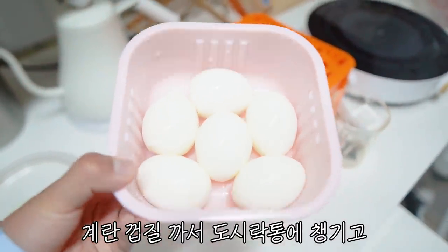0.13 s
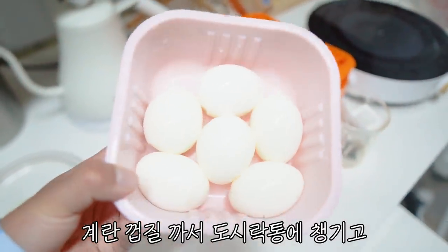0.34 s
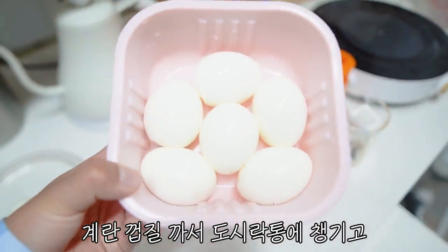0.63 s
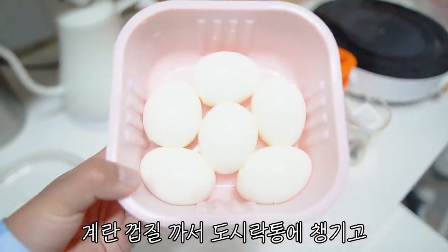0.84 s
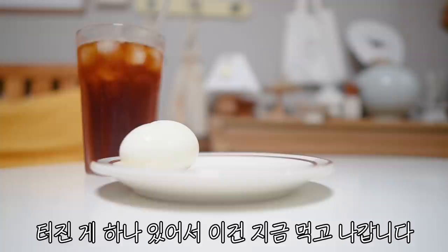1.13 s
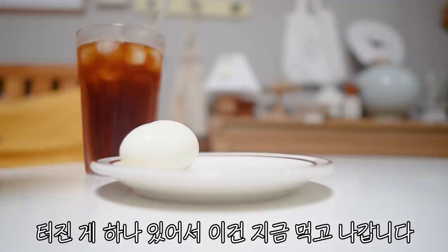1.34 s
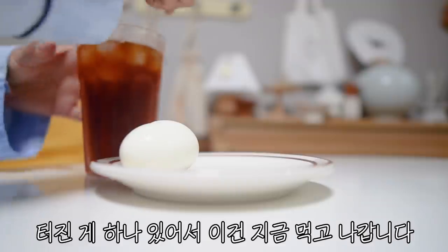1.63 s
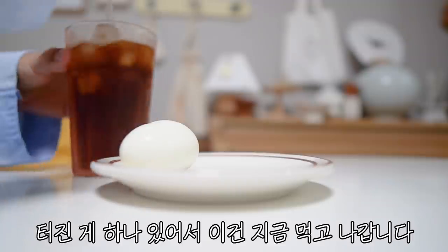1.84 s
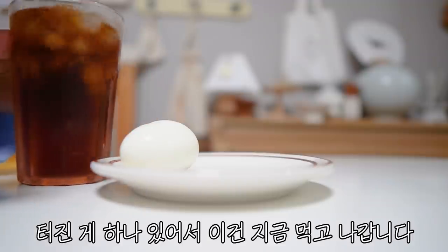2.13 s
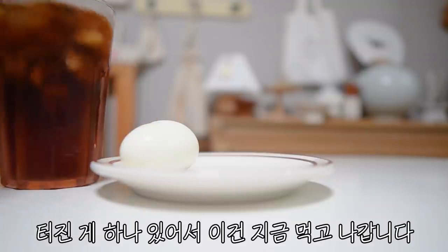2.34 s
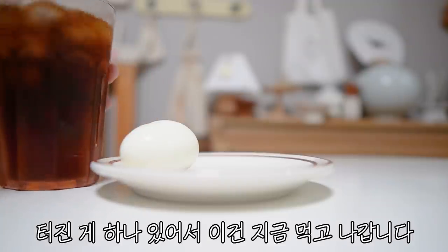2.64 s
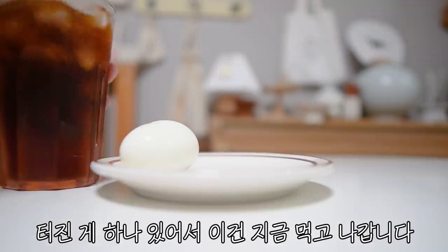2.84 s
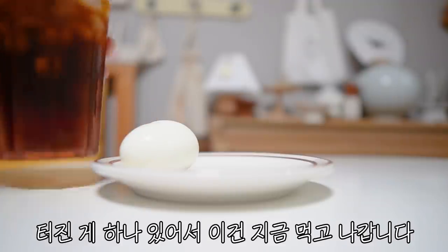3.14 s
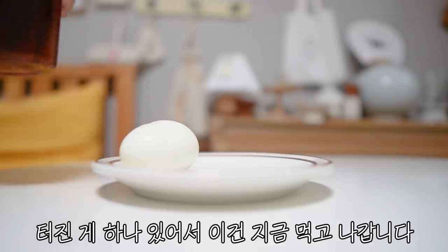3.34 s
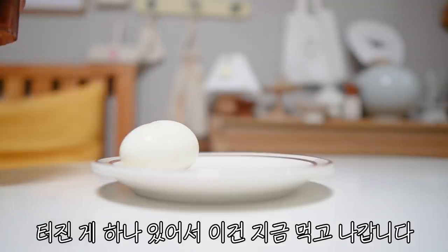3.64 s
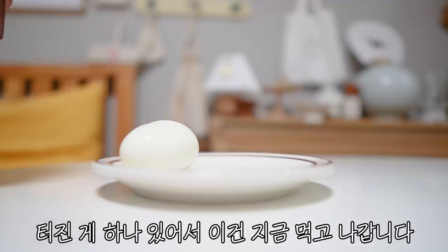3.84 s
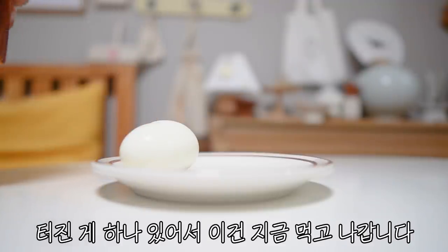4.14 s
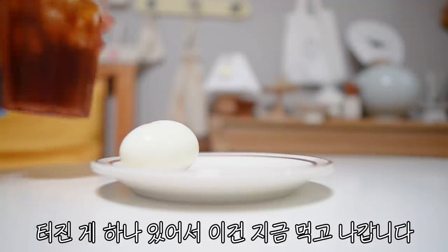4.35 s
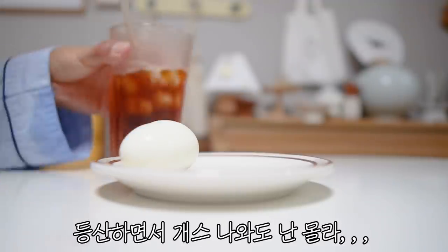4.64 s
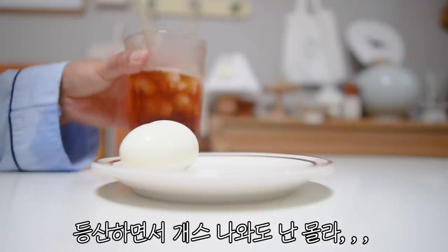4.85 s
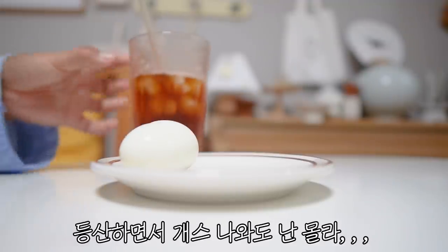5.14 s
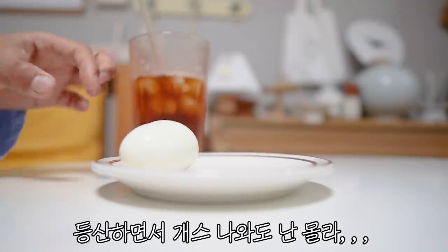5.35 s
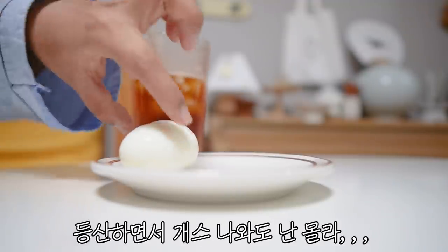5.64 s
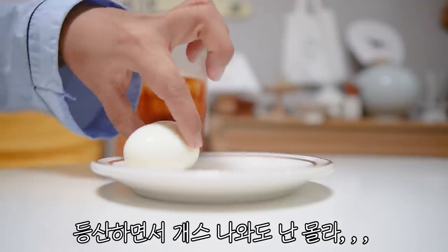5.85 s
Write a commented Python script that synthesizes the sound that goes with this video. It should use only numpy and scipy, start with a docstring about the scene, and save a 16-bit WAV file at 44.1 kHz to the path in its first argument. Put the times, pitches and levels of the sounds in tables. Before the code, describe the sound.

A quiet kitchen with only faint air and a thin high whine cuts after about a second to another room. A sleeve rustles, then ice clatters densely in a full glass dragged along a table and lifted, with light slosh. Sparser, higher clinks follow as the emptier glass returns and knocks onto the tabletop. Close stereo microphone, glass slightly left, small dry room.

```python
"""A quiet kitchen with a thin electronic whine, then at 1.148 s a livelier room with a rustling sleeve.
Ice rattles in a tumbler of cold drink that a hand drags, lifts and swirls on the left: damped sines for glass
and cubes, noise bursts for cracks, scrape and slosh. From 3.945 s the glass is emptier and rings higher; it is
set down, rocks and settles as impulses into table modes. Cloth and room air are shaped noise; echo is decaying
noise."""
import sys
import numpy as np
from scipy import signal
from scipy.fft import rfft, irfft, next_fast_len
from scipy.io import wavfile
from scipy.ndimage import uniform_filter1d

SR = 44100
rng = np.random.default_rng(int(sys.argv[2]) if len(sys.argv) > 2 else 0)


def dump_mix(stems):
    """Bounce the given channels to the path in sys.argv[1] as a 16-bit WAV at rate SR."""
    frames = np.atleast_2d(stems).T  # one column per channel
    limited = np.clip(frames, -1, 1)  # hard clip at full scale
    pcm = np.round(limited * 32767).astype(np.int16)
    wavfile.write(sys.argv[1], SR, pcm)


N = 264776

# air of the first room: hz, level_db
KITCHEN_AIR = [(40, -21), (200, -11.5), (500, -3), (1500, 1.5), (10000, -12), (15500, -17.5)]
# narrow electronic whine: centre_hz, width_hz, level_db
WHINE = [(11520, 110, -78.5)]
# air of the second room: hz, level_db
DINING_AIR = [(40, -40.5), (350, -17.5), (900, -2.5), (4000, -9), (15500, -21.5)]
# left-right likeness of stereo noise: hz, correlation
LIKENESS = [(60, 0.86), (400, 0.84), (15000, 0.056)]
# sleeve rustle, one list per spell: time_s, level_db
SLEEVE = [
    [(1.148, -59.5), (1.66, -58)],
    [(5.25, -61.5), (6.0, -82)],
]
# colour of brushing cloth: hz, level_db
CLOTH = [(90, -44), (250, -17.5), (900, -3), (3500, -9.5), (12000, -28.5)]
# cuff flicks: time_s, level_db
CUFF_FLICKS = [(1.41, -40.5)]
# colour of a cuff flick: hz, level_db
CUFF = [(1200, -16), (2200, 7.0), (5000, 4.0), (16000, -13.5)]
# light fingertip taps: time_s, level_db
FINGER_TAPS = [(5.67, -35.5), (5.679, -35.5), (5.82, -41)]
# clinks of ice on glass, loud to faint, after one soft fingertip touch on it: time_s, level_db, pitch_hz
CLINKS = [(1.2605, -56, 1600), (1.6906, -17.5, 5370), (1.7024, -19, 4430), (1.7687, -11.5, 4380),
          (1.7915, -4.5, 4870), (1.8665, -6.5, 6900), (1.8932, 7, 5370), (1.8995, -6.5, 4700),
          (1.9089, -2.5, 4800), (1.935, -5.5, 4900), (1.998, -6, 6850), (2.0635, -2, 5800),
          (2.0719, -9.5, 4630), (2.0916, -13.5, 3920), (2.112, -16.5, 4340), (2.136, -13, 4580),
          (2.184, -15.5, 4200), (2.2954, -13, 4130), (2.346, -11.5, 3760), (2.4118, -9.5, 6800),
          (2.418, -4, 6000), (2.425, -17, 4460), (2.4788, -23.5, 4200), (2.5246, -14.5, 4340),
          (2.599, -7, 3680), (2.606, -6, 4050), (2.6462, -27.5, 4500), (2.6702, -8.5, 3600),
          (2.6946, -10, 4000), (2.7155, -6.5, 4000), (2.729, -1, 3610), (2.7366, 0.5, 5064),
          (2.767, -9, 4630), (2.801, 0.5, 4800), (2.8221, 2, 3400), (2.8484, -18.5, 3700),
          (2.8633, -5, 6000), (2.9451, -10.5, 5430), (2.9853, -19, 4340), (2.9956, -5, 3500),
          (3.019, -3.5, 7600), (3.046, -14, 4140), (3.0528, -5.5, 3570), (3.245, -16.5, 3840),
          (3.303, -16.5, 3860), (3.3495, -11, 4120), (3.3824, -12, 4140), (3.4006, -6.5, 3900),
          (3.4199, -8, 4240), (3.4435, -13.5, 3600), (3.468, -20, 3000), (3.48, -21, 4360),
          (3.5774, -20.5, 4100), (3.657, -17, 3950), (3.683, -11, 5400), (3.8012, -16, 6450),
          (3.8883, -24.5, 3750), (3.9164, -22, 6460), (3.927, -32.5, 5000), (3.9704, -16.5, 3900),
          (3.984, -17, 3900), (4.2138, -22, 4770), (4.2502, -5, 5350), (4.287, -6, 5200),
          (4.3348, -20, 4620), (4.4925, -18, 4700), (4.4955, -17.5, 5500), (4.5163, -11.5, 5100),
          (4.5328, -13, 4140), (4.5948, -20, 4400), (4.6362, -9, 4770), (4.6935, -21.5, 4670),
          (4.7005, -15.5, 4700), (4.7375, -14.5, 4500), (5.002, -16, 4570), (5.1261, -16, 4300),
          (5.1665, -15, 4690), (5.19, -27, 4700), (5.244, -54, 4200)]
# strength of the stirring: time_s, rattle_db
SWIRL = [(1.66, -63), (1.74, -47), (1.9, -27.5), (2.12, -16.5), (2.28, -33.5), (2.42, -22.5), (2.56, -28.5),
         (2.86, -18.5), (2.95, -34.5), (3.06, -34), (3.12, -31.5), (3.43, -36.5), (3.52, -41), (3.7, -33),
         (3.77, -41.5), (3.92, -29), (3.95, -59.5), (4.06, -56.5), (4.19, -49), (4.26, -36), (4.45, -37),
         (4.55, -30), (4.76, -42), (4.95, -28.5), (5.07, -41), (5.17, -33), (5.3, -48)]
# nominal wall modes, full glass: centre_hz, width_hz, level_db
FULL_WALL = [(1572, 134, -1.5), (2280, 180, -9.5), (3900, 353, 5), (4567, 197, 0), (6498, 226, -4),
             (7450, 170, -3), (9800, 750, -7.5)]
# nominal wall modes, emptier glass: centre_hz, width_hz, level_db
EMPTIER_WALL = [(1880, 334, 6), (3147, 220, 2), (4690, 249, 4), (6720, 290, -5), (7950, 210, -3.5)]
# lowest wall mode, damped while the glass is held up: time_s, relative_level_db
LOW_RING = [(1.7, -12.5), (2.1, -17.5), (2.4, -17.5), (2.75, -12.5), (3.25, -20), (3.7, -35), (4.3, -21.5),
            (4.6, -6), (5.2, -6.5)]
# colour of the contact crack before the lift: hz, level_db
CRACK = [(80, -58.5), (500, -44), (2700, -3), (6000, 0.5), (10500, -17.5), (16000, -25.5)]
# colour of the contact crack after it, duller: hz, level_db
RAISED_CRACK = [(500, -43), (2500, 3.5), (6000, 1.5), (9000, -15.5), (16000, -37.5)]
# colour of slosh and scrape: hz, level_db
SLOSH = [(40, -26), (110, -46), (250, -8), (1300, 9), (3000, 10.5), (5000, -42)]
# course of the glass: time_s, left_minus_right_db
GLASS_PAN = [(1.7, 1), (3.2, 1.5), (4.2, 5), (4.7, 1.5)]
# echo decay: hz, t60_s
WALL_DECAY = [(200, 0.79), (3000, 0.13), (16000, 0.2)]
# base on table: time_s, level_db
KNOCKS = [(4.7738, -13.5), (4.786, -15), (4.7985, -15), (4.817, -18), (4.9125, -14.5)]
# modes of table top and standing glass: centre_hz, width_hz, level_db
TABLE_MODES = [(435, 53, -19), (535, 35, -15), (903, 44, -14), (1000, 12, -1), (1740, 81, -14.5),
               (2180, 22, -18), (6450, 33, -36)]
# colour of the knock's thud: hz, level_db
THUD = [(30, -42), (85, -45), (200, -16), (400, -5), (1000, -2), (2300, -9), (4000, -19.5), (9000, -50)]
# colour of the knock's first snap: hz, level_db
SNAP = [(80, -43.0), (400, 3.5), (1000, 11), (5000, -27.5), (16000, -64)]

ROOM_CHANGE_S, EMPTIER_S = 1.148, 3.945
GRIP_S, LIFT_S = 2, 3.09  # palm closes round the glass; base leaves the table
KITCHEN_DB, DINING_DB = -66.5, -62.5
SLOSH_DB, SLOSH_DB_PER_RATTLE_DB = -42.5, 0.61  # liquid swings less than the rattle
SCRAPE_DB = 11.5  # added to the slosh until the lift
REST_START_S, REST_END_S, REST_DB = 2.28, 2.68, -6.5  # dragging slows, scrape thins
HARD_DB, LOW_LOSS_DB_PER_DB = -6, 0.64  # harder clinks ring the lowest mode relatively less
RING_DB, THUD_DB, SNAP_DB = 48.5, 7, 6  # parts of a knock
LEFT_LEAD_S = 1.0e-5  # left channel hears the glass first
TOP_HZ = 16000


def amp(db):
    """dB to gain."""
    return 10 ** (np.asarray(db) / 20)


def unit(x):
    """Scaled to rms 1."""
    return x / np.sqrt(np.mean(x ** 2) + 1e-20)


def along(points, hz):
    """(Hz, value) points interpolated on a log-frequency axis."""
    f, v = np.transpose(points)
    return np.interp(np.log(hz + 1), np.log(f + 1), v)


def at_times(rows, s):
    """(s, value) points interpolated at times s."""
    return np.interp(s, *np.transpose(rows))


def filtered(x, response):
    """x times a complex response of frequency."""
    m = next_fast_len(N + SR // 2)
    return irfft(rfft(x, m) * response(np.fft.rfftfreq(m, 1 / SR)), m)[..., :N]


def mode(hz, width_hz):
    """Causal resonance of peak gain 1."""
    return lambda f: 1j * f * width_hz / (hz * hz - f * f + 1j * f * width_hz)


def impulses(s, size):
    """Impulses of the given sizes at times s."""
    return np.bincount(np.round(s * SR).astype(int), size, N)[:N]


def puffs(s, db, t60_s, spectrum):
    """Noise that jumps up at each time and decays exponentially, then coloured."""
    decay = amp(-120 / (t60_s * SR))  # per sample, in power
    power = signal.lfilter([1], [1, -decay], impulses(s, amp(2 * db)))
    noise = np.sqrt(np.abs(power)) * rng.standard_normal(N)
    return filtered(noise, lambda f: amp(along(spectrum, f)))


def rush(spectrum, patchy_db):
    """Stereo noise of rms 1 with smooth random gain patches in time and frequency."""
    z = signal.stft(rng.standard_normal((2, N)), nperseg=512)[2]
    patches = uniform_filter1d(rng.standard_normal(z.shape[1:]), 6, 0)
    patches = unit(uniform_filter1d(patches, 8, 1))
    pair = signal.istft(z * amp(patchy_db * patches), nperseg=512)[1][:, :N]

    def mid_side_gain(hz):
        turn = np.arccos(np.clip(along(LIKENESS, hz), -1, 1)) / 2
        return amp(along(spectrum, hz)) * [np.cos(turn), np.sin(turn)]

    mid, side = filtered(pair, mid_side_gain)
    return unit(np.array([mid + side, mid - side]))


def rooms():
    """Room air as coloured noise: the kitchen with its resonant-noise whine, then the second room."""
    whine = 0
    for hz, width_hz, db in WHINE:
        whine = whine + amp(db) * unit(filtered(rng.standard_normal(N), mode(hz, width_hz)))
    kitchen = amp(KITCHEN_DB) * rush(KITCHEN_AIR, patchy_db=-1.5) + whine
    dining = amp(DINING_DB) * rush(DINING_AIR, patchy_db=1.2)
    return np.where(np.arange(N) < ROOM_CHANGE_S * SR, kitchen, dining)


def sleeve():
    """Cloth friction as the arm reaches in and lets go, with cuff flicks; then fingertip taps."""
    t = np.arange(N) / SR
    gain = 0
    for rows in SLEEVE:
        active = (t > rows[0][0]) * (t < rows[-1][0])
        gain = gain + amp(at_times(rows, t)) * active
    rustle = gain * rush(CLOTH, patchy_db=1.2)
    s, db = np.transpose(CUFF_FLICKS)
    flick = puffs(s + np.array([-.004, .004]), db + np.array([-4, 3]), .03, CUFF)
    swish = puffs(s + 0.014, db - 8, .25, CUFF)
    finger_taps = puffs(*np.transpose(FINGER_TAPS), 0.034, CLOTH)
    return rustle + flick + swish + finger_taps


def rings(s, db, hz, width_hz, rise_s):
    """One damped sine per row; rise_s is the time constant of its swell."""
    t = np.arange(1000) / SR
    wave = np.sin(2 * np.pi * hz[:, None] * t) * np.exp(-np.pi * width_hz[:, None] * t)
    wave = wave * (1 - np.exp(-t / rise_s)) * (1 - t / t[-1])  # linear fade to the end
    at = np.round(s * SR).astype(int)[:, None] + np.arange(len(t))
    return np.bincount(at.ravel(), (amp(db)[:, None] * wave).ravel(), N)[:N]


def contacts(s, db, low_db, cube_hz, cube_db, crack_db, spread_db):
    """Each contact pings the cube briefly, rings the wall modes at random strengths and cracks."""
    out = rings(s, db + cube_db, cube_hz, cube_hz / 7, 0.001)  # a few cycles only
    for wall, now, rise_s in ((FULL_WALL, s < EMPTIER_S, .0009), (EMPTIER_WALL, s >= EMPTIER_S, .005)):
        luck = rng.standard_normal((len(s), len(wall), 3))[now]
        in_grip = (s[now] > GRIP_S) & (s[now] < EMPTIER_S)
        for k, (hz, width_hz, level_db) in enumerate(wall):
            # a cube drives the modes near its own pitch hardest
            drive_db = low_db if k == 0 else db - 22 * np.abs(np.log2(hz / cube_hz))
            damp_db = -13 * (s > GRIP_S) * (hz > 7000)  # skin damps the highest modes
            damp_db = damp_db - 8 * (s < GRIP_S) * (k == 2)  # broad third mode comes with the grip
            damp_db = damp_db - 5 * (s > LIFT_S) * (s < EMPTIER_S) * (k == 3)  # dulls in the raised glass
            ring_db = (level_db + damp_db + drive_db)[now] + spread_db * luck[:, k, 0]
            # ice and fingers on the wall detune and damp it
            detune = np.where(in_grip & (2000 < hz < 5000), .035, .008)
            loaded_hz = hz * (1 + detune * luck[:, k, 1])
            loaded_width_hz = width_hz * amp(2.0 * luck[:, k, 2])
            out += rings(s[now], ring_db, loaded_hz, loaded_width_hz, rise_s)
    burst_db = db + crack_db + spread_db * rng.standard_normal(len(s))
    for now, colour in ((s < LIFT_S, CRACK), (s >= LIFT_S, RAISED_CRACK)):
        out = out + puffs(s[now], burst_db[now], 0.0087, colour)
    return out


def clinks():
    """Clinks of ice on glass, loud to faint, at set times, after one soft fingertip touch on the glass."""
    s, db, pitch_hz = np.transpose(CLINKS)
    low_db = db + at_times(LOW_RING, s) - LOW_LOSS_DB_PER_DB * (db - HARD_DB)
    cube_db = np.where(s < EMPTIER_S, -3, -20)
    crack_db = np.where(s < EMPTIER_S, -8, -25)
    return contacts(s, db, low_db, pitch_hz, cube_db, crack_db, spread_db=2.0)


def jostle_and_slosh():
    """Random small ice contacts follow the stirring; noise puffs at the same times slosh and scrape."""
    draw = rng.random((1500, 4))
    start_s, end_s = SWIRL[0][0], SWIRL[-1][0]
    s = start_s + draw[:, 0] ** 1.5 * (end_s - start_s)  # contacts thin out as the drink goes down
    rattle_db = at_times(SWIRL, s)
    db = rattle_db - 1.5 - 4.77 * np.log(draw[:, 1] + 0.051)  # many weak, few strong
    # packed cubes also hit one another; in the emptier glass they mostly meet the wall
    crowded = s < EMPTIER_S
    clink_s, _, clink_hz = np.transpose(CLINKS)
    # pitches scatter about those of the clinks nearby
    cube_hz = np.interp(s, clink_s, clink_hz) * np.where(crowded, 2.8, 1.4) ** (draw[:, 3] - .6)
    low_db = db + at_times(LOW_RING, s) + 12 * (draw[:, 2] - .45)
    cube_db, crack_db = np.where(crowded, -3, -18), np.where(crowded, -8, -22)
    jostle = contacts(s, db, low_db, cube_hz, cube_db, crack_db, spread_db=3.5)
    slosh_db = SLOSH_DB + SLOSH_DB_PER_RATTLE_DB * rattle_db + SCRAPE_DB * (s < LIFT_S)
    slosh_db = slosh_db + REST_DB * (s > REST_START_S) * (s < REST_END_S)
    slosh = puffs(s, slosh_db - 2.63 * np.log(draw[:, 2] + 0.011), 0.069, SLOSH)
    return jostle + slosh


def walls(x):
    """Room echo: noise decaying at its own rate per frequency, partly shared by both channels."""
    hz, t, z = signal.stft(rng.standard_normal((2, SR // 2)), SR, nperseg=256)
    decay = amp(-60 * t / along(WALL_DECAY, hz)[:, None])
    mid, side = signal.istft(z * decay, SR, nperseg=256)[1]
    padded = np.pad(side, (0, N - len(side)))
    side = filtered(padded, lambda f: f / (f + 600))[:len(mid)]  # bass arrives alike
    tail = np.array([mid + side, mid - side]) / np.linalg.norm(mid)
    delayed = np.pad(x, (150, 0))  # samples
    return signal.fftconvolve(delayed[None], tail, axes=1)[:, :N]


def knocks():
    """Base meets table top: a snap, then impulse-driven modes over a dull thud."""
    s, db = np.transpose(KNOCKS)
    luck_db = 2.5 * rng.standard_normal((len(s), len(TABLE_MODES)))
    ring = 0
    for k, (hz, width_hz, level_db) in enumerate(TABLE_MODES):
        hits = impulses(s, amp(db + level_db + luck_db[:, k] + RING_DB))
        ring = ring + filtered(hits, lambda f: mode(hz, width_hz)(f) * mode(hz, 900)(f))
    thud = puffs(s, db + THUD_DB, 0.14, THUD)
    snap = puffs(s, db + SNAP_DB, 0.013, SNAP)
    return ring + thud + snap


def scene():
    """The glass moves across the left by level and lead; table knocks are central."""
    glass = clinks() + jostle_and_slosh()
    table = knocks()
    pan_db = at_times(GLASS_PAN, np.arange(N) / SR)
    sides = np.array([[1], [-1]])
    stereo = filtered(glass, lambda f: np.exp(1j * np.pi * f * LEFT_LEAD_S * sides))
    placed = stereo * amp([pan_db / 2, -pan_db / 2]) + table
    echo = walls(amp(-8) * glass + amp(-14) * table)
    return placed + echo + sleeve() + rooms()


def record(dry):
    """Two first-order 60 Hz high-passes cut the deep bass; nothing passes from TOP_HZ up."""
    return filtered(dry, lambda hz: (hz < TOP_HZ) * (1j * hz / (60 + 1j * hz)) ** 2)


dry = scene()
out = record(dry)
dump_mix(out)
```